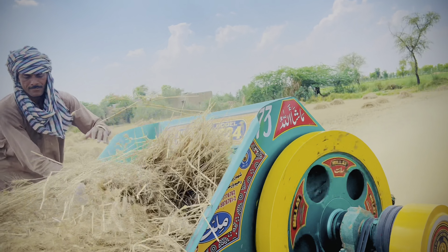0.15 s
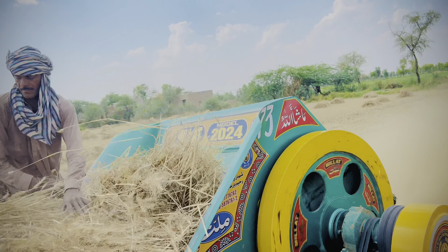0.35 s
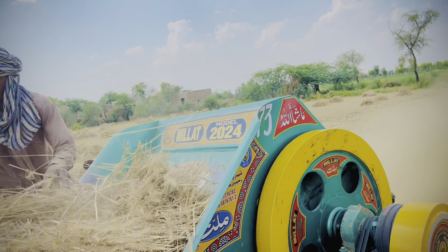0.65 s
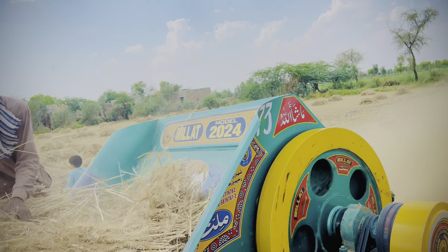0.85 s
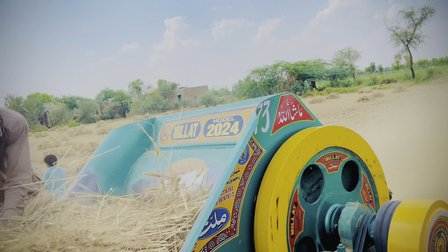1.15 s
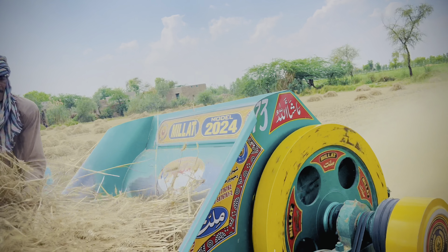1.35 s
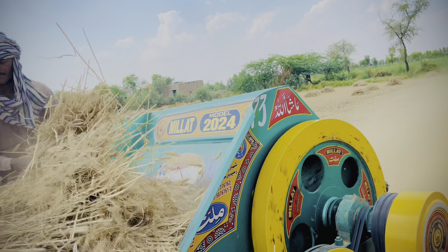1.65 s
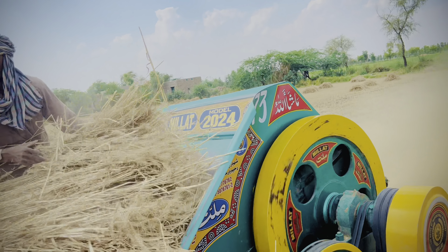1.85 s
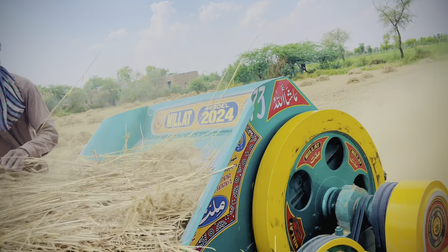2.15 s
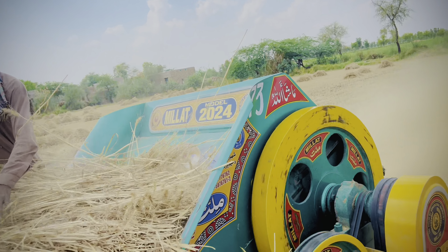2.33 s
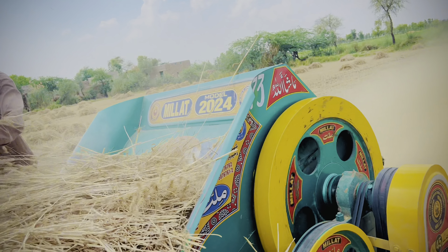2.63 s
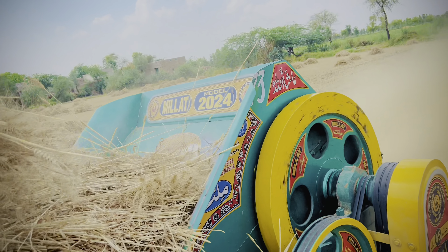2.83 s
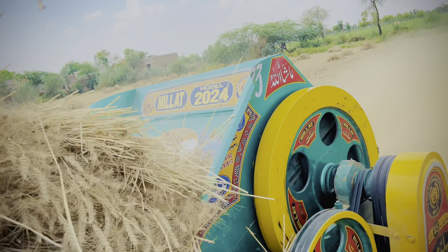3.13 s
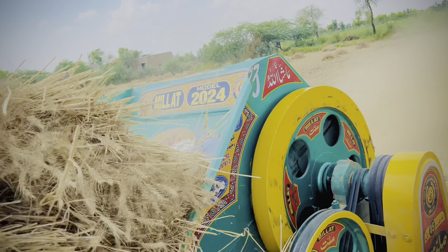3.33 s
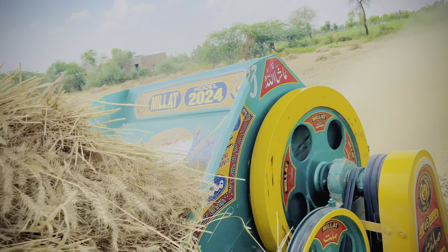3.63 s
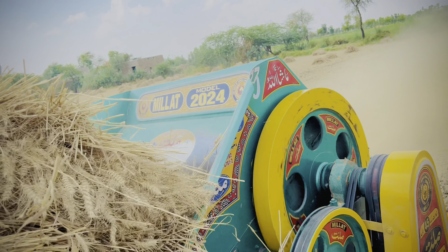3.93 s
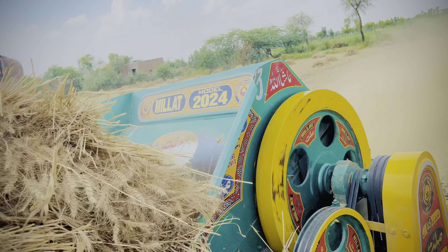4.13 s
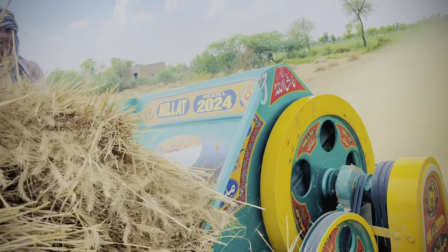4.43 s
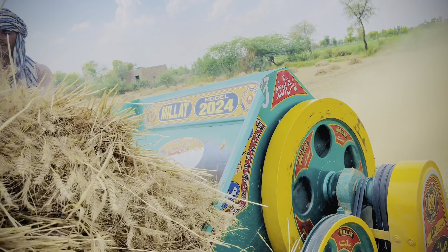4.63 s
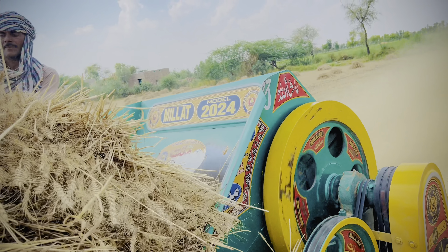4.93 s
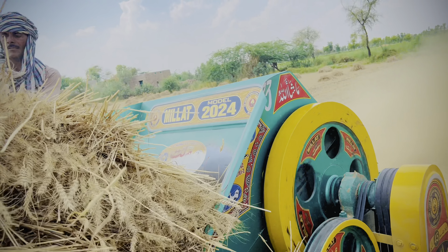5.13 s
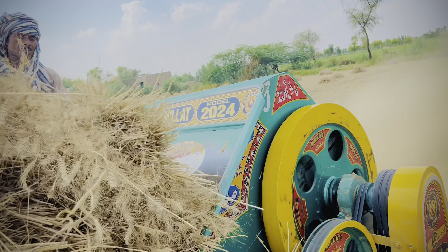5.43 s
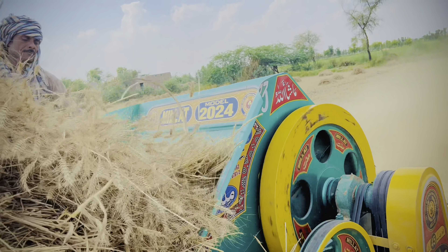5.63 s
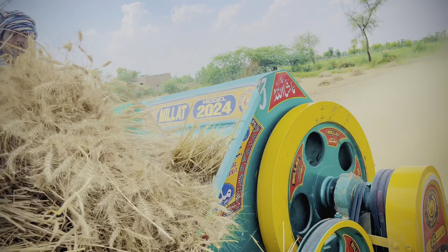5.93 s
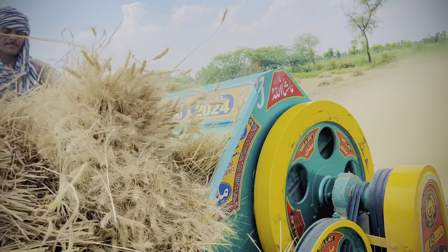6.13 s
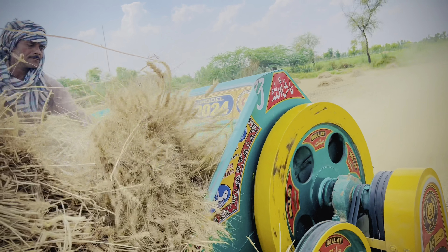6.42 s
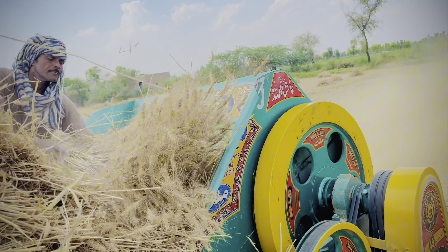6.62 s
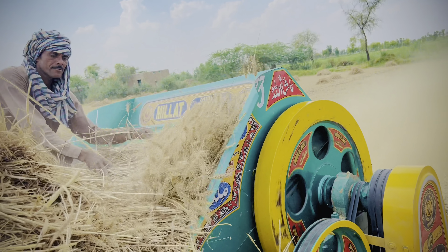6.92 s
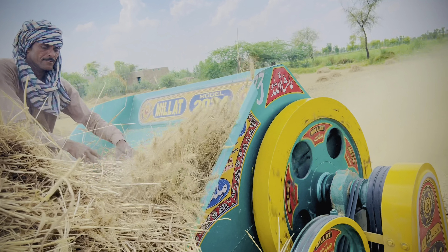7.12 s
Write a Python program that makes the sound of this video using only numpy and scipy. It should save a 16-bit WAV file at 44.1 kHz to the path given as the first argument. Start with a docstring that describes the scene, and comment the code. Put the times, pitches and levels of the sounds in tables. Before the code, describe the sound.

Loud, low throbbing hum of a threshing drum in an open field, slowing as sheaves go in, amid booming air, crackling straw and fine hiss.

```python
"""The drum of a belt-driven wheat thresher throbs, heard from beside its feed chute in an open field. Its speed
follows a set curve, sagging under the sheaves; the belt slips with their load, so the tones of engine and drum
beat together. Shaped noise makes air boom in the sheet-steel housing, straw rustle, chaff hiss and the blower
rush; decaying modes ring the casing under wads and stalk ends; gears whine, brief rubs squeal and a high engine
line flares as wavering sines. All is spread in stereo, and the top is cut steeply."""
import sys
import numpy as np
from scipy import signal
from scipy.fft import rfft, irfft, next_fast_len
from scipy.io import wavfile

SR = 44100
rng = np.random.default_rng(int(sys.argv[2]) if len(sys.argv) > 2 else 0)


def unload_wav(signal):
    """Save mono or channel-first audio to the path in sys.argv[1] as 16-bit WAV at rate SR, clipped to [-1, 1]."""
    wavfile.write(
        sys.argv[1],
        SR,
        np.round(np.clip(np.atleast_2d(signal).T, -1, 1) * 32767).astype(np.int16),
    )


N = 320607
TIME = np.arange(N) / SR
PADDED = next_fast_len(N)
FREQS = np.fft.rfftfreq(PADDED, 1 / SR)
LEFT_RIGHT = np.array([[.5], [-.5]])  # splits a difference evenly between left and right

TONE_DB_PER_OCTAVE = 25.5  # growth of the shaft tones with speed


def drone(drum, engine, load, octaves, pan_db=-0.5):
    """All tones of engine and drum grow with speed; the throb is a suction at the feed chute."""
    tones = lumps(engine) - throb(drum, engine) - hum(drum, engine, load)
    return tones * undb(TONE_DB_PER_OCTAVE * octaves) * pan(pan_db)


# the twice-a-turn drone, which surges and ducks: (t/s, level/dB at cruising speed)
OCTAVE_LEVEL = [(.12, -25.5), (.35, -37), (.55, -36), (.8, -24.5), (1.4, -19.5), (1.68, -30), (1.85, -22),
                (2.2, -27), (2.5, -21), (3.1, -24.5), (3.27, -40), (3.52, -37), (3.8, -20.5), (4.22, -24),
                (4.6, -18), (5.47, -35), (5.95, -34), (6.3, -26.5), (6.6, -28), (6.85, -22)]


def throb(drum, engine, throb_db=-28.5, drum_share=0.67):
    """Engine and drum surge once a turn, in and out of step; the beater rows drone an octave above."""
    once = np.exp(1j * engine) + drum_share * np.exp(1j * drum)
    surge_db, = curves(OCTAVE_LEVEL)
    octave = tone(np.exp(2j * drum), order=2, db=surge_db)
    return tone(once, order=1, db=throb_db) + octave


# resonances of the housing that the hum glides through: (f/Hz, level/dB at cruising speed, before the drive)
HOUSING = [(134, -27), (143, -36), (152, -31), (168, -31.5), (183, -28.5), (195, -36), (210, -25.5),
           (226, -45), (255, -33), (278, -29), (312, -42.5), (335, -33), (360, -35), (378, -40.5),
           (402, -34), (437, -34.5), (458, -40), (475, -42.5), (492, -35), (515, -58), (570, -50)]
# how hard the beaters drive shaft orders 3 to 10:
# (level/dB, extra level/dB per unit of load above the average, drift in dB/s about mid-scene)
ORDER_DRIVE = [(-1, 0, 0.66), (0, 2.5, 0.46), (1, 0.5, 0.1), (-1, 3, 0.24), (-2.5, -1, -0.24),
               (1, 1.5, 0.05), (-2.5, 1.5, 1.2), (1.5, 6.5, -0.06)]


def hum(drum, engine, load, wander_db=1.42, other_share=0.86, phase_spread=1.76):
    """Shaft orders 3 to 10 sharpen the throb into a pulse and swell as they cross housing resonances."""
    hz, db = np.transpose(HOUSING)
    out = 0
    for order, (order_db, load_db, drift_db) in enumerate(ORDER_DRIVE, 3):
        # the third is mainly the engine's, the rest mainly the drum's; the other shaft beats against it
        main, other = (engine, drum) if order == 3 else (drum, engine)
        order_hz = order * np.gradient(main) * SR / (2 * np.pi)
        response_db = np.interp(order_hz, hz, db)
        drive_db = order_db + load_db * (load - load.mean()) + drift_db * (TIME - TIME.mean())
        pair = np.exp(1j * order * main) + other_share / order * np.exp(1j * order * other)
        wave = pair * np.exp(1j * phase_spread * rng.uniform(-1.05, 1))
        out = out + tone(wave, order, drive_db + response_db + wander_db * walk(5.9))
    return out


CYLINDERS = 3  # one engine cycle lasts this many turns
# lines of the unequal cylinders between the shaft orders: (multiple of the cycle, level/dB before lump_db)
LUMPS = [(4, -40), (5, -42), (7, -44), (8, -41), (11, -43), (13, -46), (17, -46)]


def lumps(engine, lump_db=-10.5):
    """The cylinders fire unequally and no two cycles are alike, thickening the throb into a rumble."""
    cycle = engine / CYLINDERS
    out = 0
    for k, db in LUMPS:
        wave = np.exp(1j * (k * cycle + .7 * walk(3)))
        out = out + tone(wave, k / CYLINDERS, db + lump_db)
    return out


def tone(wave, order, db, waver_db=1.07, jitter=0.0023, side_lag=0.064, side_sway=0.11):
    """One slightly unsteady shaft order; higher orders differ more between left and right."""
    lag = LEFT_RIGHT * order * (side_lag + side_sway * walk(0.81))  # rad
    phase = lag + jitter * order * walk(1.2)
    return np.sqrt(2) * undb(db + waver_db * walk(8.9)) * np.real(wave * np.exp(1j * phase))


# the engine gains on the drum at this rate under a load of size 1, and begins behind it
SLIP_TURNS_PER_S, START_LEAD_TURNS = .6, -.26


def slipping(drum, load):
    """The belt slips under load, so the engine's angle creeps ahead of the drum's."""
    return drum + 2 * np.pi * (START_LEAD_TURNS + SLIP_TURNS_PER_S * np.cumsum(load) / SR)


DRAW_IN_S, CLEAR_S = .82, .43  # a sheaf is drawn in gradually and clears faster
# sheaves dragged into the drum: (t/s of the heaviest load, size)
SHEAVES = [(.73, .71), (1.54, 1.0), (1.81, .72), (2.78, .84), (4.42, 1.24), (6.04, .5), (7.75, .75)]


def feed():
    """The load on the drum: each sheaf builds up as it is drawn in, then clears."""
    load = 0
    for s, size in SHEAVES:
        after = TIME - s
        load = load + size * np.exp(-np.where(after < 0, (after / DRAW_IN_S) ** 2, after / CLEAR_S))
    return load


def effort(load, octaves, load_db, speed_db, wander_db):
    """How many dB a noise gains with load and with each octave of speed; it wanders a little."""
    return load_db * load + speed_db * octaves + wander_db * walk(1.0)


def beaters(angle, once, twice):
    """The rotor's throb: one surge a turn from imbalance, two from the opposed beater rows."""
    return 1 + once * np.cos(angle) + twice * np.cos(2 * angle)


# churned air in the housing: (f/Hz, relative level/dB per Hz)
ROAR = [(18, -30), (36, -23), (65, -6), (130, -4.5), (220, -7.5), (290, -5.5), (400, -9), (515, -4),
        (600, -9.5), (800, -14), (1100, -23), (1600, -59)]


def roar(angle, db, roar_db=-27.5, flutter_db=0.63):
    """Air churned by the beaters booms in the housing, puffing with the rotor."""
    puffs = beaters(angle, once=0.14, twice=0.24)
    air = rng.standard_normal((2, N)) * puffs * undb(flutter_db * walk(58))
    return colour(air, ROAR) * undb(db + roar_db)


PULLEY_RATIO, PULLEY_SHARE = .25, .06  # a slow pulley, geared down from the drum, rocks the feed
# how deeply the rustle pulses with each turn: (t/s, share)
PULSING = [(0, .08), (1.2, .08), (2, .15), (3.6, .15), (4.2, .09), (4.8, .2), (6, .26), (7.27, .23)]
# stalks rubbing and breaking: (f/Hz, relative level/dB per Hz)
RUSTLE = [(1400, -50), (2400, -18.5), (3000, -21), (3700, -22), (5000, -26), (5350, -26.5), (5800, -24),
          (6900, -25.5), (7650, -30.5), (9400, -28), (11000, -63), (15000, -50)]


def straw(angle, db, straw_db=-34.5):
    """Stalks rustle through the throat in tufts, most as a beater passes; the pulley rocks the flow."""
    rubbing = stalks(snaps_per_s=1200, snap_db=-10.5)
    tufts = patchy(rubbing, 1870, 8900, depth_db=1.0, rate=27.0, count=20)
    depth, = curves(PULSING)
    pulley = 1 + PULLEY_SHARE * np.cos(PULLEY_RATIO * angle)
    surge = beaters(angle, once=depth, twice=0.35 * depth) * pulley
    return colour(tufts * surge, RUSTLE) * undb(db + straw_db)


def stalks(snaps_per_s, snap_db):
    """Steady rubbing with a crowd of tiny snaps of uneven size."""
    snapping = rng.random(N) < snaps_per_s / SR
    snaps = unit(rng.standard_normal((2, N)) * snapping)
    return rng.standard_normal((2, N)) + undb(snap_db) * snaps


# wads of straw hit the casing: (t/s, level/dB before thump_db, pitch as a ratio to the casing's modes)
THUMPS = [(0.283, -18, 1.01), (0.679, -4.5, 1.0), (0.708, -15, 1.01), (0.724, -14, 1.0), (1.468, -14, .98),
          (1.78, -16, .96), (3.765, -19, .99), (4.25, -20, 1.02), (4.492, -15.5, .98)]
# what the casing rings with, here and under the patter:
# (f/Hz, t60/s, relative level/dB under a soft wad, relative level/dB under hard stalk ends)
CASING = [(522, .07, 0, 0), (665, .1, -19, -3.5), (828, .1, -19, -5.5), (965, .12, -24, -6),
          (1275, .08, -26, -5), (1590, .07, -30, -7)]


def thumps(push_s=0.016, thump_db=-2.5, crush_db=-20.5, pan_db=-1.5):
    """Each wad presses on the steel briefly and leaves it ringing; where it lands sets the pitch."""
    out, t = np.zeros(N + SR), TIME[:SR // 3]
    soft = signal.butter(2, [400, 1400], "bandpass", fs=SR, output="sos")
    press, after = np.minimum(t / push_s, 1), np.maximum(t - push_s, 0)
    for s, db, pitch in THUMPS:
        ring = 0
        for hz, t60, wad_db, _ in CASING:
            ring = ring + undb(wad_db - 60 * after / t60) * np.sin(2 * np.pi * pitch * hz * t)
        crush = unit(signal.sosfilt(soft, rng.standard_normal(len(t)))) * np.exp(-after / push_s)
        start = int(s * SR)
        out[start:start + len(t)] += undb(db + thump_db) * press * (ring + undb(crush_db) * crush)
    return out[:N] * pan(pan_db)


def patter(angle, db, patter_db=-38.0, taps_per_s=200, scatter_db=3.5, tick_db=-6.5):
    """Stalk ends flung at the casing as beaters pass; each ticks and rings the panels differently."""
    t = TIME[:SR // 6]
    struck = rng.random(N) < taps_per_s / SR * beaters(angle, once=.3, twice=.3)
    taps = struck * undb(scatter_db * np.minimum(rng.exponential(size=N), 2.5))
    ring = 0
    for hz, t60, _, stalk_db in CASING:
        mode = undb(stalk_db - 60 * t / t60) * np.sin(2 * np.pi * hz * t)
        blows = taps * rng.standard_normal((2, N))
        ring = ring + signal.fftconvolve(blows, mode[None], axes=1)[:, :N]
    panels = colour(ring, [(300, 0), (2500, 0)])
    ticks = colour(taps * rng.standard_normal((2, N)), RUSH)
    return (panels + undb(tick_db) * ticks) * undb(db + patter_db)


# chaff skating over sheet steel: (f/Hz, relative level/dB per Hz)
SIZZLE = [(7000, -15), (7850, 1), (8100, 6), (8240, 15), (8420, 7), (8650, 11.5), (8900, 1), (9500, 9),
          (10000, -6), (11000, -37), (12000, -19)]
# the finest chaff and dust: (f/Hz, relative level/dB per Hz)
SPRAY = [(9000, -164), (11000, 6.5), (12300, 7.5), (14000, 6.5), (15500, 3), (17000, -14)]


def chaff(angle, on_steel_db, in_air_db, sizzle_db=-44.5, spray_db=-36.5, flutter_db=0.8):
    """Chopped chaff sizzles over the steel and sprays out as a fine hiss."""
    sizzle = colour(stalks(snaps_per_s=1700, snap_db=-3.0), SIZZLE) * undb(2 * flutter_db * walk(62))
    spray = colour(stalks(snaps_per_s=2700, snap_db=-15.0), SPRAY) * undb(flutter_db * walk(20))
    both = sizzle * undb(on_steel_db + sizzle_db) + spray * undb(in_air_db + spray_db)
    return both * beaters(angle, once=0.015, twice=0.09)


MESH_PER_TURN = 10.52  # gear mesh cycles per engine turn
# harmonics of the gear mesh: (multiple, level/dB at the start, level/dB at the end)
GEARS = [(2, -41, -50), (3, -48.5, -44.5), (4, -50, -51)]
# the third harmonic of the gears sings out: (middle t/s, length/s, extra level/dB)
GEAR_FLARES = [(1.25, 0.4, 10), (2.0, 0.32, 10), (2.5, .2, 1), (4.42, .25, 1), (6.086, .16, 9),
               (6.4, .25, 5)]


def whine(engine):
    """The gears whine faintly with the engine's speed, wavering and now and then singing out."""
    flare_db = sum(db * bump(s, length) for s, length, db in GEAR_FLARES)
    out = 0
    for k, start_db, end_db in GEARS:
        phase = k * (MESH_PER_TURN * engine + .3 * walk(12))
        db = np.linspace(start_db, end_db, N) + 2.5 * walk(7) + (k == 3) * flare_db
        out = out + undb(db) * np.array([np.cos(phase), np.cos(phase + 1.93)])
    return out


# brief rubbing squeals, the last a short flare of a high engine line near 1.6 kHz: # (middle t/s, length/s,
# f/Hz at the middle, level/dB before squeal_db)
SQUEALS = [(0.827, 0.069, 830, -32.5), (.91, 0.088, 3030, -50), (1.264, 0.099, 808, -33),
           (1.523, 0.093, 793, -32), (3.42, 0.235, 2490, -49), (5.868, 0.14, 1600, -40)]


def squeals(squeal_db=3.0, slip=0.97, arch=0.015):
    """Something rubs and sings for a moment, or a high engine line flares briefly; its unsteady pitch rises and
    falls with the swell."""
    out = 0
    for s, length, hz, db in SQUEALS:
        swell = bump(s, length)
        pitch_hz = hz * (1 - arch * (1 - swell))
        phase = 2 * np.pi * np.cumsum(pitch_hz) / SR + slip * walk(22)
        out = out + undb(db + squeal_db) * swell * np.array([np.cos(phase), np.cos(phase + 1.35)])
    return out


# air rushing through blower and sieves, also the colour of the patter's ticks:
# (f/Hz, relative level/dB per Hz)
RUSH = [(450, -7), (700, -1), (850, -1), (1080, -1.5), (1280, 0.5), (1400, -1), (1580, -1), (1800, -5.5),
        (2150, -6.5), (2800, -17.5), (4000, -75)]


def blower(angle, db, rush_db=-31.0):
    """The draught rushes through the sieves; narrow resonances flare up and die away in it."""
    gusts = patchy(rng.standard_normal((2, N)), 600, 2600, depth_db=2.1, rate=5., count=30)
    return colour(gusts * beaters(angle, once=0.026, twice=0.028), RUSH) * undb(db + rush_db)


def undb(db):
    """Decibels to gain."""
    return 10 ** (np.asarray(db) / 20)


def unit(x):
    """Scaled to rms 1."""
    return x / np.sqrt(np.mean(x ** 2))


def pan(db):
    """Left and right gains for a level difference."""
    return undb(LEFT_RIGHT * db)


def curves(table):
    """The columns of a timed table, one value per sample."""
    s, *columns = np.transpose(table)
    return [np.interp(TIME, s, c) for c in columns]


def swing(table):
    """The level columns of a timed table, in dB about their own means."""
    return [c - c.mean() for c in curves(table)]


def bump(s, length):
    """A smooth swell to 1 at time s, down to 1/e at the ends of its length."""
    return np.exp(-(2 * (TIME - s) / length) ** 2)


def walk(rate, size=2048):
    """Slow chance with spread 1, holding nothing much faster than rate per s."""
    hz = np.fft.rfftfreq(size, N / SR / size)
    slow = unit(irfft(rfft(rng.standard_normal(size)) * np.exp(-(hz / rate) ** 2)))
    return np.interp(TIME, np.linspace(0, N / SR, size), slow)


def patchy(x, low_hz, high_hz, depth_db, rate, count):
    """Neighbouring bands swell and fade apart, so the colour keeps changing."""
    place = np.interp(np.log(FREQS + 1), np.log([low_hz, high_hz]), [0, count - 1])
    spectrum = rfft(x, PADDED)
    out = 0
    for k in range(count):
        overlap = np.maximum(1 - np.abs(place - k), 0)
        band = irfft(spectrum * overlap, PADDED)[:, :N]
        out = out + band * undb(depth_db * walk(rate))
    return out


# stereo width by frequency:
# (f/Hz, left-right likeness 0..1, lead of left over right/rad, left minus right level/dB)
STEREO = [(60, .9, 0, -.5), (290, .76, 0, -1.3), (520, .68, .4, -1), (640, .15, 1.1, -.5),
          (850, .42, 1.6, .8), (1100, .34, 2.9, -.6), (1500, .72, 3.7, -1), (2000, .66, 3.5, -.8),
          (2900, .38, 2.7, 4.5), (3700, .33, 4.4, 8), (5000, .16, 6.9, 12), (5900, .1, 5.6, 11.4),
          (6900, .2, 7.3, 7.5), (8250, .42, 5.2, 5.3), (9400, .05, 4.5, 1), (10000, .95, 3.14, 0),
          (11000, .97, 3.14, 0), (11600, .7, 2, 0), (11900, .99, 0, 0)]


def colour(pair, spectrum):
    """Two unrelated signals take on this spectrum, spread left to right by the stereo table."""
    log_hz = np.log(FREQS + 1)
    hz, db = np.transpose(spectrum)
    gain = undb(np.interp(log_hz, np.log(hz), db, left=-120, right=-120))
    hz, *columns = np.transpose(STEREO)
    likeness, lead, balance_db = (np.interp(log_hz, np.log(hz), c) for c in columns)
    # the shared part and the opposed part set how alike left and right are
    mid, side = rfft(pair, PADDED) * np.sqrt([1 + likeness, 1 - likeness])
    spread = pan(balance_db) * np.exp(1j * LEFT_RIGHT * lead)
    return unit(irfft(np.array([mid + side, mid - side]) * gain * spread, PADDED)[:, :N])


CRUISE_TURNS_PER_S = 48
# the drive sags under the sheaves, then picks up: (t/s, shaft turns per s)
SPEED = [(0, 57), (.5, 56.3), (.75, 55.3), (1.1, 53.5), (1.4, 51.3), (1.8, 49), (2.3, 47.7), (2.7, 47),
         (3.2, 47.3), (3.6, 47), (3.95, 47.3), (4.3, 45.7), (4.5, 44.9), (4.9, 44.4), (5.25, 44.7),
         (5.65, 45.4), (6.25, 46.9), (6.75, 48.8), (7.27, 51)]
# the next three tables are used only as swings about their own means
# rushing air: (t/s, level/dB)
DRAUGHT = [(0.0, -22), (0.55, -22.5), (0.75, -23.5), (1.0, -23.0), (1.25, -21.5), (1.5, -22.5),
           (1.85, -24.5), (2.25, -24.4), (2.7, -23), (3.05, -26.5), (4.35, -24.5), (4.9, -27.5),
           (5.2, -25.5), (5.85, -25.5), (6.05, -26), (7.25, -24)]
# rustling straw: (t/s, level/dB)
STRAW_LEVEL = [(0.0, -27.5), (0.45, -27), (0.75, -25.5), (0.95, -26), (1.4, -23.5), (1.65, -26),
               (2.8, -26.5), (3.0, -28.5), (3.8, -27.5), (4.1, -25.5), (4.9, -29.5), (5.75, -28),
               (6.95, -29.5), (7.25, -27.5)]
# treble of the chaff: (t/s, sizzle level/dB near 8 kHz, spray level/dB above 11 kHz)
TREBLE = [(0.0, -37, -30.4), (1.05, -38.5, -29.5), (1.45, -35.3, -28), (2.0, -36.5, -30.5),
          (2.45, -38, -30.5), (2.9, -38.3, -31.1), (3.1, -34, -30.0), (3.4, -36, -33), (4.2, -32.5, -30.2),
          (4.4, -31, -30.8), (4.65, -34, -32.4), (5.3, -36.5, -33.5), (5.65, -35.5, -32.1),
          (5.85, -32, -32.4), (6.05, -34, -32.1), (6.35, -34.5, -33.5), (6.8, -39.4, -33.8),
          (7.25, -36, -32.6)]


def scene():
    """Shaft speed and load drive the tones and the roar; the flow of air and crop swells and ebbs."""
    speed, = curves(SPEED)
    angle = 2 * np.pi * np.cumsum(speed) / SR
    load, octaves = feed(), np.log2(speed / CRUISE_TURNS_PER_S)
    engine = slipping(angle, load)
    boom_db = effort(load, octaves, load_db=3.0, speed_db=3.0, wander_db=0.45)
    rush_db, = swing(DRAUGHT)
    rustle_db, = swing(STRAW_LEVEL)
    sizzle_db, spray_db = swing(TREBLE)
    machine = drone(angle, engine, load, octaves) + whine(engine) + squeals()
    air = roar(angle, boom_db) + blower(angle, rush_db)
    crop = straw(angle, rustle_db) + chaff(angle, sizzle_db, spray_db)
    blows = patter(angle, boom_db) + thumps()
    return machine + air + crop + blows


TOP_HZ = 15900


def record(dry):
    """The recorder cuts the top steeply."""
    return signal.sosfilt(signal.ellip(12, .1, 80, TOP_HZ, fs=SR, output="sos"), dry)


dry = scene()
out = record(dry)
unload_wav(out)
```